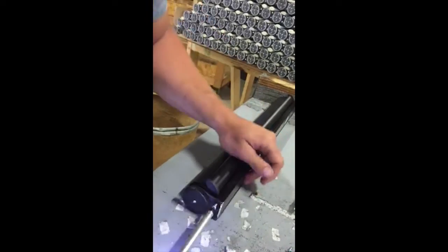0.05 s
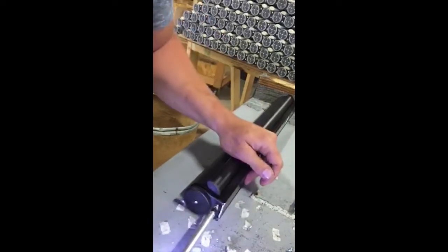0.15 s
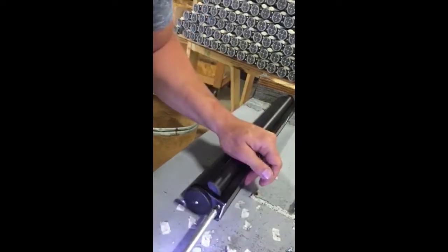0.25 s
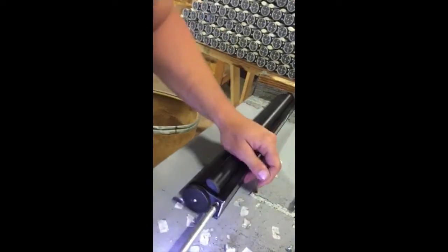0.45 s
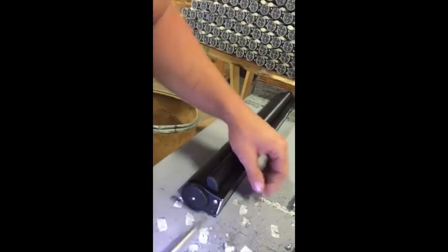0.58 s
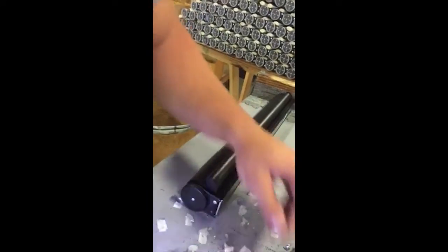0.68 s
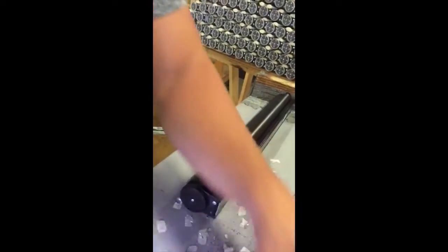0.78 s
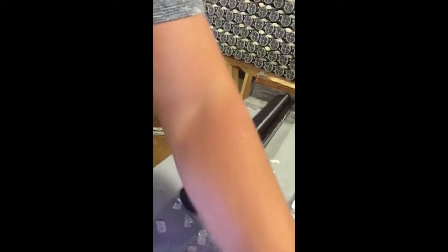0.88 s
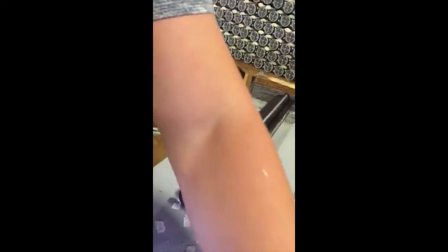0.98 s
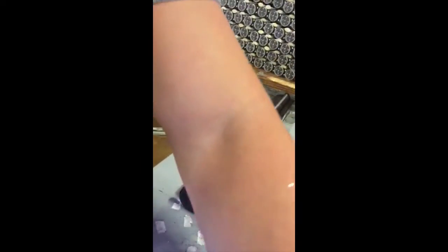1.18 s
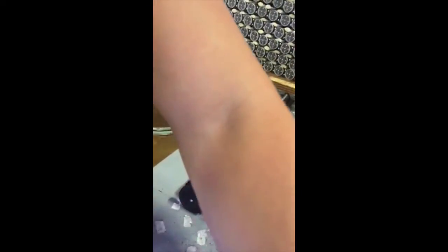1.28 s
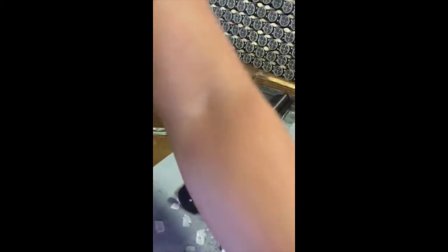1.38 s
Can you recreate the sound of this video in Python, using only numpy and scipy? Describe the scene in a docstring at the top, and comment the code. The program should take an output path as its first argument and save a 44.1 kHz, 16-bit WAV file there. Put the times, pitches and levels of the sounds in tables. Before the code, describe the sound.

A spring mechanism lets go with a click and a quick, rasping metallic whir that rises and falls, then thumps to a stop on a workbench. Light ticks and tinkles follow, heard close over a faint workshop hum.

```python
"""Spring mechanism let go on a workbench

A catch clicks, the pawl snaps, and a toothed wheel spins up and down in a fifth of a second,
whining and rasping as its teeth ring the metal tube around it. It stops with a thump into the bench.
Light handling ticks and the tinkle of a loose metal part follow, over the hum of a workshop."""
import sys
import numpy as np
from scipy import signal
from scipy.fft import rfft, irfft, next_fast_len
from scipy.io import wavfile
from scipy.ndimage import uniform_filter1d, minimum_filter1d, map_coordinates

SR = 44100
rng = np.random.default_rng(int(sys.argv[2]) if len(sys.argv) > 2 else 0)


def unload_audio(sound):
    """Save the sound as a 16-bit wav file, at the path given as the first command line argument."""
    columns = np.transpose(np.atleast_2d(sound))
    # keep every value between -1 and 1, then stretch to whole-number steps
    steps = np.round(np.clip(columns, -1, 1) * 32767)
    wavfile.write(sys.argv[1], SR, steps.astype(np.int16))


N = 63945

# workshop bed: three noise colours and a machine's hum lines (frequency [Hz], relative level [dB])
RUMBLE_COLOUR = [(20, -32), (40, -3.5), (62, 6), (125, -3), (160, -15), (300, -48)]
DRONE_COLOUR = [(80, -35), (150, 3), (200, -3), (300, -10), (430, -12), (560, -7.5), (720, -6), (900, -16),
                (1500, -15.5), (2500, -17), (5000, -52.5)]
HISS_COLOUR = [(600, -16), (1100, -4), (2000, -3.5), (3300, 1), (5300, -7), (8000, -12), (13800, -24.5),
               (15500, -30)]
HUM_LINES = [(183, -54.5), (366, -59.5), (555, -59), (710.6, -52.5), (1130, -64), (1421, -65.5)]
# faders of the bed (time [s], rumble [dB], drone and hum [dB], hiss [dB])
BED_FADERS = [(0, -43, -45.5, -55), (.15, -46.5, -47.5, -53), (.43, -42.5, -54.5, -47),
              (.47, -45.5, -61, -68), (.505, -50, -58, -56.5), (.54, -53, -55, -54.5),
              (.62, -58, -55, -52.5), (.71, -54, -51, -57.5), (.82, -46, -46, -54.5),
              (1, -46.5, -45.5, -53), (1.45, -45, -46.5, -54)]
# cues for handling, catch and housing, pawl, and loose part (time [s], level [dB])
TICK_CUES = [(.146, -40), (.585, -51), (.602, -38), (.624, -39.5), (.639, -47), (1.198, -48),
             (1.2665, -31.5)]
CATCH_CUES = [(.1565, -17), (1.127, -42.5)]
SNAP_CUES = [(.192, -31), (.1962, -21.5), (.1986, -9), (.3705, -15), (.384, -12.5), (.388, -17)]
TINKLE_CUES = [(0.601, -46), (.6095, -42), (.624, -41), (1.133, -49), (1.142, -52), (1.222, -52),
               (1.332, -57)]
# tone of each of those contacts (frequency [Hz], relative level [dB])
TICK_EQ = [(300, -14), (1500, 6.5), (3000, 0.5), (4400, 4.5), (6500, -11), (9500, -11), (15000, -16)]
CATCH_EQ = [(60, -15), (200, -4), (450, -15), (1000, 2.5), (1900, 5.5), (2800, -6.5), (4500, -9),
            (6500, -13), (8000, -34), (9400, -16), (10500, -34), (15000, -40)]
SNAP_EQ = [(300, -16.5), (1500, -5.5), (3000, 7), (4600, 11), (5600, -6.5), (9300, -11), (11000, -29.5),
           (15000, -22)]
TINKLE_EQ = [(1000, -35), (4500, -22), (5600, -2), (7000, -10), (8500, -9), (9400, 0), (10150, -2),
             (11000, -12), (12200, -12), (15000, -11)]
# blows into the bench (time [s], level [dB], treble corner [Hz])
THUMP_CUES = [(0.159, -31, 840), (.371, -25, 266), (0.3916, -11.5, 112.5), (.446, -43.5, 220)]
# modes of the bench (frequency [Hz], relative level [dB], t60 [s])
BENCH_MODES = [(110, 0.5, 0.046), (64, -34, 0.39), (223.3, 4.5, 0.057), (290, -2.5, .05), (492, 3, 0.044)]
# speed of the wheel (time [s], tooth rate [Hz])
WHEEL_SPEED = [(.198, 500.1), (.215, 1329), (.23, 2042), (.25, 3020), (.28, 3617), (.305, 3779),
               (.328, 3674), (.342, 3380), (.365, 2511), (.392, 1212)]
# faders of the whine (time [s], tooth tone [dB], partials below it [dB], partials above it [dB])
WHINE_FADERS = [(.2, -49, -40.5, -28.5), (.228, -15, -26.5, -12.5), (.24, -2, -44, -9.5),
                (.258, -1.5, -14, -18.5), (.275, -1, -19, -20), (.295, -4.5, -19, -24.5),
                (.315, -5.5, -15, -24), (.344, -8, -22.5, -20.5), (.355, -20, -35, -29.5),
                (.372, -21, -41, -19), (.387, -32, -36.5, -37.5)]
# side partials of the whine (multiple of the turning rate, relative level [dB])
WHINE_PARTIALS = [(1, -14.5), (6, -22), (9, -1), (12, -7.5), (27, -6), (34, -5.5), (36, -4.5), (45, -8)]
# faders of the rasp (time [s], body [dB], treble [dB])
RASP_FADERS = [(.198, -30.5, -44.5), (.21, -20.5, -28.5), (.22, -21, -21), (.236, -4.5, -12.5),
               (.255, -14.5, -12), (.29, -18, -17), (.33, -27.5, -19), (.36, -27, -25), (.388, -24, -27)]
# its two noise colours (frequency [Hz], relative level [dB])
RASP_BODY_COLOUR = [(100, -10.5), (500, -30.5), (800, -18.5), (1100, -7), (1800, -8), (2800, -9),
                    (4400, 4.5), (5000, -17.5), (6500, -28)]
RASP_TREBLE_COLOUR = [(3500, -32), (5100, 0.5), (6500, 1), (9400, -1.5), (10400, -10), (13000, -8.5),
                      (15500, -15.5)]
# modes of the metal tube (frequency [Hz], bandwidth [Hz], relative level [dB])
TUBE_MODES = [(1876, 39, -4), (2176, 80, -3.5), (3254, 91, 0), (3770, 6, -14), (4350, 165, 1.5),
              (4523, 30, 0.5), (6760, 140, -3), (8320, 56, -11), (9230, 50, -18)]
# decay of the room (frequency [Hz], t60 [s])
ROOM_DECAY = [(200, 0.9), (1200, 0.36), (4000, 0.32), (9000, 0.35), (15000, 0.208)]

TEETH = 18
START_S, STOP_S, ATTACK_S, RELEASE_S = .197, .3876, .004, .012
BEATS_PER_TURN, BEAT_SHARPNESS, BEAT_SCATTER = .66, 1.3, .19
HUM_REF_DB, TUBE_DB = -43.5, -28
WHIR_SEND_DB, CONTACT_SEND_DB = -24.5, -11.5
LIMIT_PEAK, LIMIT_S = .83, .0007
TOP_HZ, EDGE_HZ = 15700, 450
TIME = np.arange(N) / SR


def amp(db):
    """Decibels to gain."""
    return 10 ** (np.asarray(db) / 20)


def unit(x):
    """Scale to rms 1."""
    return x / np.sqrt(np.mean(x ** 2) + 1e-20)


def along(points, hz):
    """Read (frequency [Hz], value) points on a log axis."""
    freqs, values = np.transpose(points)
    return np.interp(np.log(hz + 1), np.log(freqs + 1), values)


def curves(rows):
    """One automation curve for each column after the time."""
    times, *columns = np.transpose(rows)
    return [np.interp(TIME, times, column) for column in columns]


def wobble(rate):
    """A smooth random curve, rate knots a second."""
    return map_coordinates(rng.standard_normal(4096), [TIME * rate], mode='mirror')


def filtered(x, response):
    """Pass x through a frequency response."""
    size = next_fast_len(N + SR // 2)
    return irfft(rfft(x, size) * response(np.fft.rfftfreq(size, 1 / SR)), size)[:N]


def noise(colour):
    """Coloured noise of rms 1."""
    return unit(filtered(rng.standard_normal(N), lambda hz: amp(along(colour, hz))))


def workshop():
    """The bed: rumble, a machine's drone and hum, and hiss; it dips after the whir."""
    rumble_db, drone_db, hiss_db = curves(BED_FADERS)
    hum = np.zeros(N)
    for hz, db in HUM_LINES:
        level = np.sqrt(2) * amp(db - HUM_REF_DB + 2.7 * wobble(13.08))
        hum += level * np.sin(2 * np.pi * hz * TIME + .5 * wobble(9.88))
    return (amp(rumble_db) * noise(RUMBLE_COLOUR)
            + amp(drone_db) * (noise(DRONE_COLOUR) + hum)
            + amp(hiss_db) * noise(HISS_COLOUR))


def clicks(cues, eq, t60, ring_db):
    """Each contact is a sharp push and a short scatter of ringing, coloured by one EQ."""
    size = 4096
    t = np.arange(size // 2) / SR
    # minimum phase, so nothing rings ahead of the hit
    cepstrum = irfft(np.log(amp(along(eq, np.fft.rfftfreq(size, 1 / SR)))))
    cepstrum[1:size // 2] *= 2
    cepstrum[size // 2 + 1:] = 0
    body = irfft(np.exp(rfft(cepstrum)))
    out = np.zeros(N + SR)
    for start, db in cues:
        force = amp(ring_db - 60 * t / t60) * rng.standard_normal(len(t))
        force[0] = 1
        hit = signal.fftconvolve(force, body)
        hit *= np.sqrt(SR / 1000) / np.linalg.norm(hit)  # the energy of 1 ms at rms 1
        out[round(start * SR):][:len(hit)] += amp(db) * hit
    return out[:N]


def handling_ticks():
    """Light, bright touches on the mechanism."""
    return clicks(TICK_CUES, TICK_EQ, t60=.025, ring_db=-14)


def catch_knocks():
    """Catch and housing knock in the midrange: once on release, once faintly later."""
    return clicks(CATCH_CUES, CATCH_EQ, t60=.028, ring_db=-17.5)


def bench_thumps():
    """The bench takes the recoil and the final stop; a softer blow leaves out its higher modes."""
    out = np.zeros(N + SR)
    t = np.arange(SR // 2) / SR
    attack = 1 - np.exp(-t / .0011)
    for start, level_db, corner_hz in THUMP_CUES:
        ring = sum(amp(db - 60 * t / t60) / (1 + (hz / corner_hz) ** 3) * np.sin(2 * np.pi * hz * t)
                   for hz, db, t60 in BENCH_MODES)
        out[round(start * SR):][:len(t)] += amp(level_db) * attack * ring
    return out[:N]


def pawl_snaps():
    """The pawl snaps, hard and tight, as the wheel starts and stops."""
    return clicks(SNAP_CUES, SNAP_EQ, t60=.0077, ring_db=-9)


def wheel_spin():
    """Turns made so far, and a gate that is open while the wheel runs."""
    tooth_hz, = curves(WHEEL_SPEED)
    turns = np.cumsum(tooth_hz) / SR / TEETH
    attack = np.clip((TIME - START_S) / ATTACK_S, 0, 1)
    release = amp(-20 * np.maximum(TIME - STOP_S, 0) / RELEASE_S)
    return turns, attack * release


def wheel_whine(turns, gate):
    """The tooth tone swells and breaks off as the wheel rattles; rougher partials glide with it."""
    tooth_db, lower_db, upper_db = curves(WHINE_FADERS)
    beat_cycles = BEATS_PER_TURN * turns + BEAT_SCATTER * wobble(70)
    beat = np.abs(np.sin(np.pi * beat_cycles)) ** BEAT_SHARPNESS
    tooth_level = amp(tooth_db + 2.65 * wobble(128)) * beat
    out = tooth_level * np.sin(2 * np.pi * TEETH * turns + 1.05 * wobble(138.96))
    for order, db in WHINE_PARTIALS:
        fader_db, jitter_rad = (lower_db, .8) if order < TEETH else (upper_db, 1.5)
        level = amp(fader_db + db + 2.37 * wobble(200.2))
        out += level * np.sin(2 * np.pi * order * turns + jitter_rad * wobble(180.04))
    return gate * out


def tube_response(hz):
    """The metal tube: a bank of resonances of alternating polarity."""
    return sum((-1) ** k * amp(db) * 1j * hz * width / (centre ** 2 - hz ** 2 + 1j * hz * width)
               for k, (centre, width, db) in enumerate(TUBE_MODES))


def tooth_rasp(turns, gate):
    """The teeth scrape in gritty pulses, and each rings the tube with its own strength."""
    body_db, treble_db = curves(RASP_FADERS)
    tooth_pulse = 1 + .28 * np.cos(2 * np.pi * TEETH * turns)
    grit = unit(tooth_pulse * amp(.85 * wobble(600)))
    strikes = np.diff(np.floor(TEETH * turns), prepend=0) * rng.standard_normal(N)
    ring = filtered(strikes * gate, tube_response) / np.std(filtered(strikes, tube_response))
    scrape = amp(body_db) * noise(RASP_BODY_COLOUR) + amp(treble_db) * noise(RASP_TREBLE_COLOUR)
    return gate * grit * scrape + amp(TUBE_DB) * ring


def loose_tinkles():
    """A small loose metal part rings, thin and high."""
    return clicks(TINKLE_CUES, TINKLE_EQ, t60=.019, ring_db=-12)


def room(send):
    """A reverb tail in which each frequency dies at its own speed."""
    hz, t, spectrum = signal.stft(rng.standard_normal(SR // 2), SR, nperseg=256)
    decay = amp(-60 * t / along(ROOM_DECAY, hz)[:, None])
    _, tail = signal.istft(spectrum * decay, SR, nperseg=256)
    return signal.fftconvolve(send, tail / np.linalg.norm(tail))[:N]


def scene():
    """The mechanism up close over the workshop bed; the contacts sit wetter than the whir."""
    turns, gate = wheel_spin()
    whir = wheel_whine(turns, gate) + tooth_rasp(turns, gate) + pawl_snaps() + bench_thumps()
    contacts = catch_knocks() + handling_ticks() + loose_tinkles()
    reverb = room(amp(WHIR_SEND_DB) * whir + amp(CONTACT_SEND_DB) * contacts)
    return (whir + contacts + reverb + workshop())[None]


def record(dry):
    """Master chain: low cut, fast peak limiter, steep high cut."""
    mix = signal.sosfilt(signal.butter(2, 40, 'highpass', fs=SR, output='sos'), dry[0])
    window = int(LIMIT_S * SR)
    needed_gain = LIMIT_PEAK / np.maximum(np.abs(mix), LIMIT_PEAK)
    gain = uniform_filter1d(minimum_filter1d(needed_gain, 2 * window), window)
    return filtered(mix * gain, lambda hz: np.clip((TOP_HZ - hz) / EDGE_HZ, 0, 1) ** 2)[None]


dry = scene()
out = record(dry)
unload_audio(out)
```